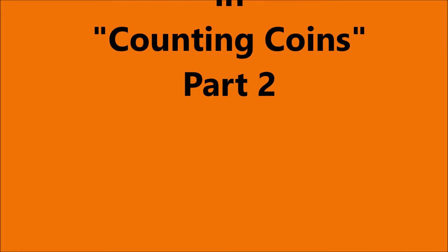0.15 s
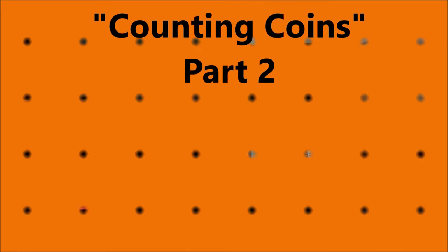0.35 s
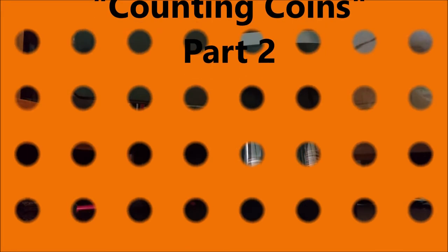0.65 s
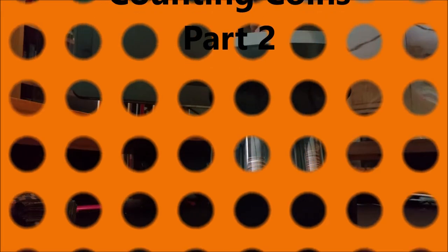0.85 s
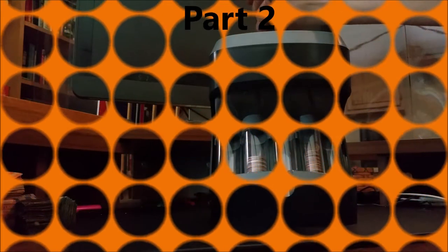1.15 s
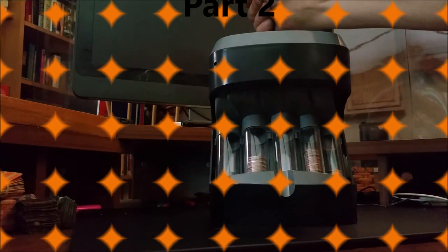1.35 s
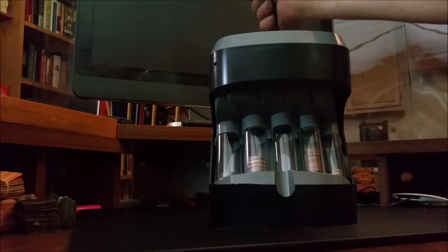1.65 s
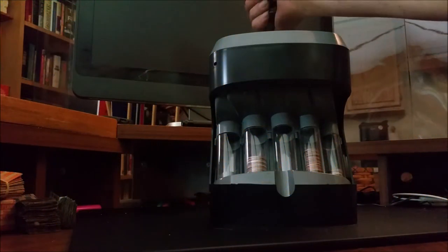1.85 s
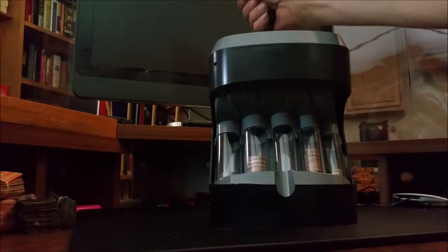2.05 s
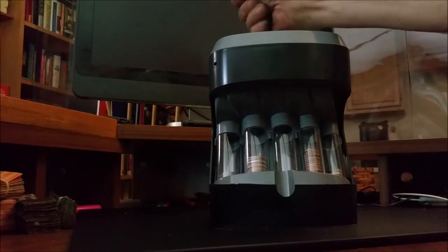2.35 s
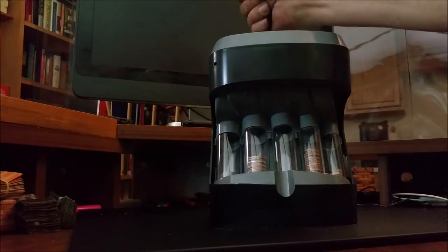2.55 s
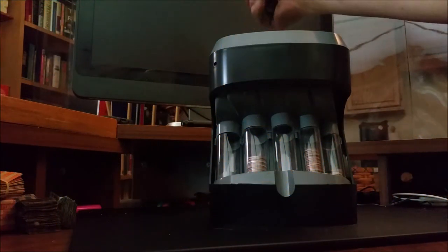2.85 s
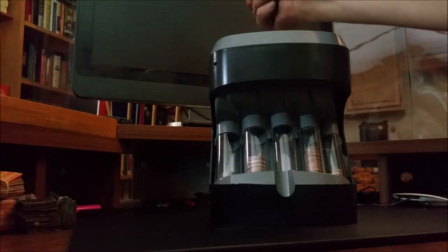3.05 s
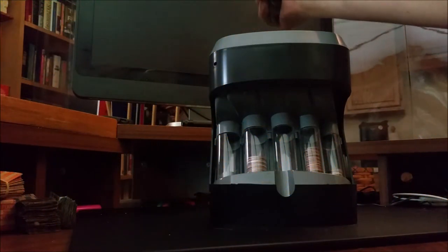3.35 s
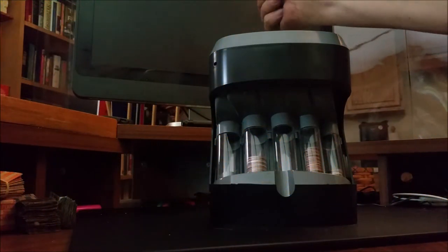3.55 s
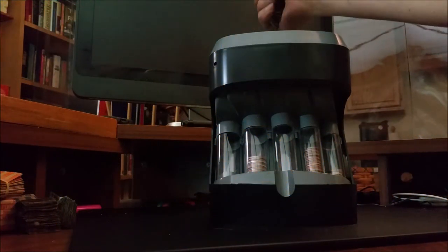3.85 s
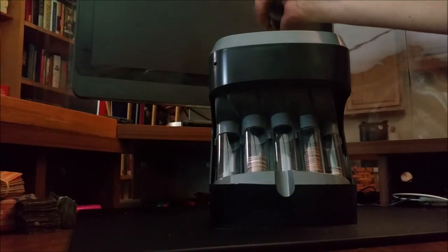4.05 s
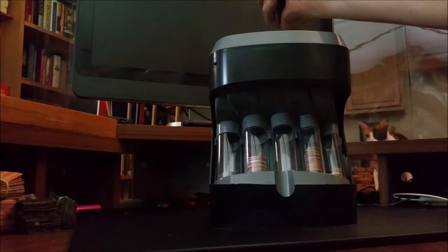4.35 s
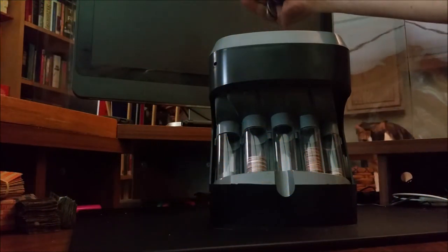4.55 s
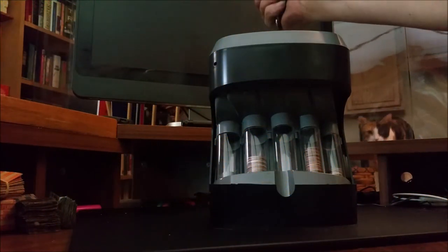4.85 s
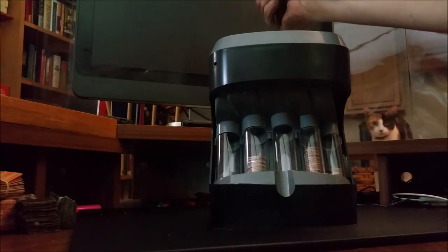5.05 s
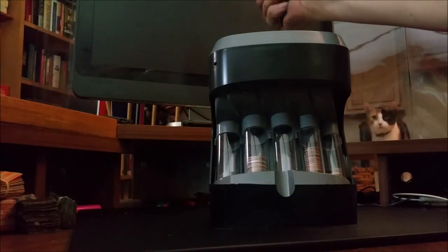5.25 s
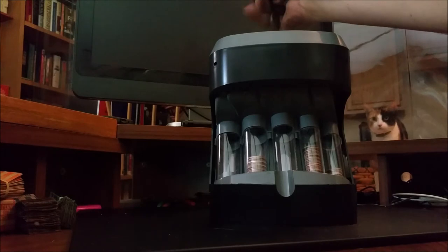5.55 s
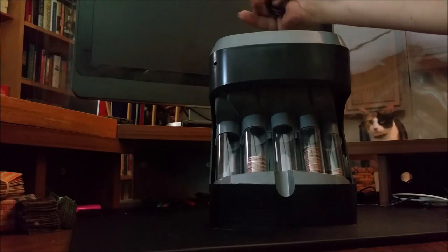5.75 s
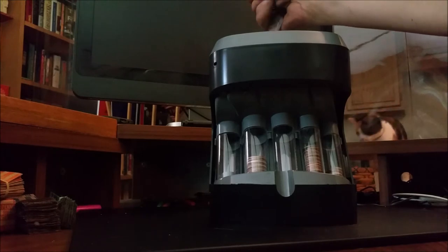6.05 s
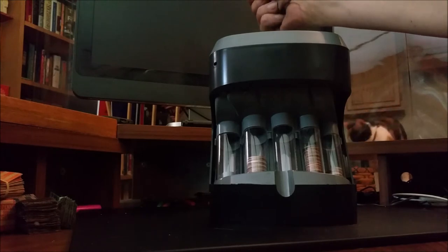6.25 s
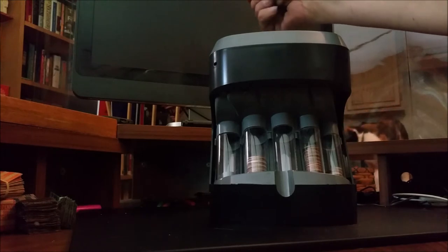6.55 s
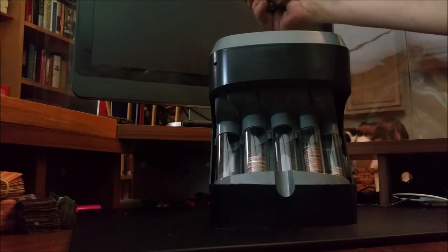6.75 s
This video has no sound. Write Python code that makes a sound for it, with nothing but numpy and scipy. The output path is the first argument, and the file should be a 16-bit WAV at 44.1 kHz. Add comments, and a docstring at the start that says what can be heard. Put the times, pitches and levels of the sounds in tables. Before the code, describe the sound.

After a moment of silence, the hum of a small motorized coin sorter cuts in at about 0.2 seconds: a steady gear tone with a low rumble and the light rustle of a turning disc. From 0.4 seconds coins drop into the plastic hopper, rattle down chutes and land in tubes, making sharp, irregular clacks mixed with bright metallic ticks and occasional thin, high rings. The clatter is dense until about 1.8 seconds, thins out, then returns with a loud cluster at 2.5 seconds. After a short lull around 3 seconds it picks up at 3.6 and carries on unevenly, with strong hits near 4.3, 5.8 and 6.3 seconds. The motor runs underneath throughout, a little softer around 4.5 to 5.5 seconds, and is still going at the end, near 7 seconds. The sound is close and in stereo, in a quiet room with little echo.

```python
"""A gear hum cuts in after a moment of silence: a small motor-driven coin sorter on a table.
Coins drop into the plastic hopper, rattle down the chutes and land in their tubes. Each blow rings
modes of the housing and the coin; falling coins ring thin and high, and tick against each other.
Underneath run the gear-mesh tone, a rumble and the rustle of the disc.
Quiet room, close stereo microphone; gain control ducks the loud blows."""
import sys
import numpy as np
from scipy import signal
from scipy.fft import rfft, irfft, next_fast_len
from scipy.io import wavfile
from scipy.ndimage import uniform_filter1d

SR = 44100
rng = np.random.default_rng(int(sys.argv[2]) if len(sys.argv) > 2 else 0)


def inscribe(sig):
    """Save sig as 16-bit PCM at rate SR to the path in sys.argv[1].

    A 1-D sig is mono; a 2-D sig holds one channel per row.
    Samples are clipped to [-1, 1] before scaling.
    """
    pcm = np.round(np.clip(np.atleast_2d(sig).T, -1, 1) * 32767)
    wavfile.write(sys.argv[1], SR, pcm.astype(np.int16))


N = 304731
START_S = 0.231
EVENT_SAMPLES, LEAD_SAMPLES = 6144, 128

# running machine: t/s, rumble level/dB, gear level/dB
MACHINE_LEVELS = [(.23, -38, -36.5), (.6, -37.5, -38), (.9, -34, -43.5), (1.1, -34, -38), (1.7, -33, -35.5),
                  (2.3, -34, -36), (2.7, -34, -37.5), (3.0, -34.5, -36.5), (3.5, -33, -34.5),
                  (4.25, -33.5, -38), (4.4, -36.5, -41.5), (4.7, -39, -43), (5.5, -39.5, -42),
                  (5.75, -34, -39), (6.2, -38, -41), (6.38, -44, -47), (6.55, -37, -41.5), (6.75, -34, -40),
                  (6.91, -41.5, -41)]
# gear-mesh harmonics: multiple, level/dB
GEAR_HARMONICS = [(1, -1), (2, -9.5), (3, -15.5), (5, -21), (6, -13.5), (8, -15.5), (9, -16), (12, -19.5),
                  (15, -52), (16, -24), (24, -22), (44, -41), (48, -40)]
# machine rumble, spectral shape: f/Hz, level/dB
RUMBLE_SPECTRUM = [(30, -38), (45, -25), (78, -20), (96, -6), (125, -9), (158, -3.5), (200, -13.5),
                   (260, -4), (390, -13.5), (450, -7.5), (600, -3.5), (700, -12.5), (900, -10.5),
                   (1100, -47), (1500, -37.5)]
# disc rustle, spectral shape: f/Hz, level/dB
RUSTLE_SPECTRUM = [(600, -15), (950, 3.5), (1100, -2), (1300, -0.5), (1750, -3), (1950, -4.5), (2500, -4.5),
                   (2900, -8.5), (4200, -14.5), (5700, -17.5), (7200, -27.5), (9000, -42.5), (12500, -22),
                   (16000, -36)]
# plastic housing resonances: f/Hz, width/Hz, level/dB
HOUSING_MODES = [(480, 30, -1), (586, 150, 4.5), (620, 31, -9), (798, 7.6, -9), (1245, 16, -37),
                 (1276, 19, -0.5), (1600, 47, -8.5), (1740, 180, -18.5), (2165, 117, -6), (2370, 58, -10.5),
                 (2483, 205, -3), (2730, 91, -10.5), (2926, 22, -9), (3180, 205, -7), (3440, 56, -2),
                 (3980, 30, -8.5), (4310, 66, -8), (4710, 43, -2), (5320, 280, -9.5), (5890, 81, -8),
                 (6300, 86, -8), (6830, 120, -11.5)]
# coin resonances: f/Hz, width/Hz, level/dB
COIN_MODES = [(8780, 350, -31), (9380, 400, -37), (11000, 150, -29.5), (12300, 67, -46), (12400, 58, -45),
              (14100, 72, -36), (14800, 82, -39), (14800, 51, -59)]
# broadband crack of an impact: f/Hz, level/dB
CRACK_SPECTRUM = [(300, -24), (600, 1.5), (1030, 8), (1400, 6.5), (2500, -3.5), (4600, 11.5), (7000, 1),
                  (9000, -20.5), (16000, -48)]
# coins ringing as they fall: t/s, level/dB, f/Hz, t60/s
FREE_RINGS = [(0.7344, -12, 15500, 0.098), (0.9672, -32, 15100, 0.19), (1.4995, -21, 12750, 0.17),
              (2.5294, -30, 12300, 0.48), (3.6012, -17, 12100, 0.19), (3.7135, -32, 12900, 0.18),
              (3.8267, -39, 13100, 0.6), (4.1244, -23, 12300, 0.14), (4.3, -27, 15500, 0.18),
              (4.65, -27, 15400, 0.13), (5.9614, -16, 14500, 0.12), (6.2647, -8, 14600, 0.064),
              (6.6717, -13, 15500, 0.09)]
# coin on coin, clearest ticks: t/s, treble level/dB, t60/s
COIN_TICKS = [(0.7314, -21.5, .1), (0.743, -21, 0.07), (0.9679, -9, 0.036), (1.0137, -24, 0.099),
              (1.1346, -14, .04), (1.2775, -27, 0.14), (1.483, -19, 0.22), (1.921, -25, 0.019),
              (2.154, -49, 0.033), (2.402, -25.5, 0.047), (2.5041, -9.5, 0.12), (2.5252, -11, .1),
              (2.683, -8, 0.062), (2.7386, -11.5, 0.071), (2.979, -25, 0.076), (3.002, -24, .06),
              (3.5658, -13, 0.15), (3.598, -10, .17), (4.127, -17, .054), (4.2876, -16, 0.12),
              (4.35, -18, 0.12), (4.428, -19.5, .076), (4.5511, -23, 0.099), (4.596, -23, 0.11),
              (4.7242, -32, 0.044), (4.7645, -29, 0.095), (4.9891, -32, .07), (5.0115, -22, 0.1),
              (5.0739, -19, 0.084), (5.3828, -20.5, .2), (5.681, -12, .05), (5.752, -28, .06),
              (5.839, -12.5, 0.11), (5.928, -18, 0.11), (5.989, -15, 0.14), (6.2267, -17, .11),
              (6.281, -14, 0.15), (6.641, -19, 0.042), (6.6746, -14, 0.1), (6.83, -28, 0.076)]
# coin on housing: t/s, level/dB, struck-spot f/Hz, relative clink level/dB, t60/s
COIN_BLOWS = [(0.3609, -2.5, 2370, -20.5, 0.11), (.3873, -8.5, 2400, -10, 0.081),
              (0.4692, -15.5, 2410, -18, 0.059), (0.53, -5, 3400, -9, 0.067), (.598, -8, 2420, -11, 0.11),
              (0.619, -3, 2370, -16, 0.097), (0.6491, -6, 1640, -12, 0.13), (0.7169, -8, 3620, -11, 0.058),
              (0.7322, -12.5, 2420, -8, 0.075), (.7993, -10, 3500, -8.5, 0.14),
              (0.8484, -12, 2780, -18, 0.28), (.861, -5.5, 3970, -6, 0.074), (0.873, -7, 3930, -8, 0.037),
              (0.9689, -6.5, 5000, -3, 0.045), (1.0853, -11.5, 2290, -8, 0.06),
              (1.1114, -10, 1290, -4, 0.051), (1.1338, -8.5, 5300, 1, 0.055), (1.1435, -11, 4760, 3, 0.05),
              (1.1758, -15, 2220, -8, 0.19), (1.1903, -12.5, 2830, -19, 0.15),
              (1.2052, -9.5, 1640, -5, 0.084), (1.2287, -7.5, 2300, 5, 0.024),
              (1.2384, -10.5, 5400, 2.5, .11), (1.2768, -13, 1570, -3, 0.21), (1.2907, -9, 2480, -5, 0.17),
              (1.3627, -6, 2640, -2.5, 0.096), (1.3963, 0, 1370, -10, 0.16), (1.407, -8, 1280, -4, 0.09),
              (1.4389, -3, 3300, -6, 0.16), (1.4487, 0, 3050, -5, 0.035), (1.481, -6.5, 2160, -18, 0.3),
              (1.5026, -4.5, 4660, -1.5, .064), (1.5365, -11, 2100, -15, 0.14),
              (1.5693, -10.5, 2200, -13, .23), (1.7364, -8.5, 2600, -9, 0.15),
              (1.7592, -10, 2350, -1.5, 0.055), (1.952, -20.5, 3460, -6, 0.056),
              (1.9767, -18.5, 2380, -9, 0.15), (2.2305, -19, 2160, -9.5, .046),
              (2.4881, 0.7, 1270, -6.5, 0.056), (2.5055, -1.5, 2350, -10, 0.12),
              (2.5262, -4.5, 2280, -5.5, 0.13), (2.5526, -10.5, 2190, -7.5, 0.16),
              (2.6294, -7.5, 2660, -1.5, 0.15), (2.6469, -16, 2670, -2, 0.073),
              (2.681, -6, 1620, -3.5, 0.11), (2.7397, -12, 2600, -2.5, .14), (2.7775, -17, 1330, -4, 0.1),
              (2.816, -17.5, 2600, -9, 0.22), (2.8477, -7, 3540, -18, 0.1), (2.865, -9, 1690, -8, 0.12),
              (2.9495, -7, 2765, -5.5, 0.087), (3.3122, -17, 2630, -1.5, 0.063),
              (3.3648, -19, 1700, -10, 0.12), (3.443, -17, 2210, -21, 0.12),
              (3.5656, -1, 1270, -15.5, 0.087), (3.598, -2, 2190, -4, 0.18), (3.6122, -9, 2150, -10, 0.12),
              (3.6422, -9, 2080, -12, 0.16), (3.714, -9, 2250, -1.5, 0.14),
              (3.7647, -13.5, 2180, -10, 0.14), (3.8006, -9.5, 2920, -5, 0.072),
              (3.8257, -6.5, 2600, -6, 0.052), (3.8423, -7.5, 2330, 0, 0.1),
              (3.8847, -9.5, 1600, -5, 0.077), (3.9565, -15.5, 5300, 0.5, 0.12),
              (3.987, -9.5, 4930, -2.5, 0.1), (3.9965, -6.5, 2720, 0.5, 0.079),
              (4.051, -13.5, 2300, -15, 0.09), (4.0886, -19, 2600, -6, 0.056),
              (4.125, -16, 1160, -8, 0.065), (4.2883, 3.5, 1290, -17, 0.069), (4.3017, 0, 2500, -7, 0.046),
              (4.3272, -4, 2390, -8.5, 0.081), (4.3517, -0.5, 1300, -24, 0.075),
              (4.3677, -8.5, 1300, -9, 0.12), (4.428, -10.5, 2310, -17, 0.066),
              (4.4446, -9, 2130, -13, 0.1), (4.4585, -5, 2740, -5.5, 0.055),
              (4.5509, -13.5, 1210, -15, 0.093), (4.5775, -18, 3450, -5, 0.37),
              (4.611, -14, 2480, -3.5, 0.16), (4.6563, -9, 2300, -10, 0.073),
              (4.7643, -16.5, 1200, -1, 0.17), (4.779, -11.5, 4940, 5.5, 0.04),
              (4.866, -15, 1610, 1, 0.061), (4.9172, -16.5, 2280, -33, 0.14),
              (4.9283, -14.5, 2380, -11, 0.16), (5.0109, -17.5, 1470, -5.5, 0.15),
              (5.023, -9.5, 1220, -14, 0.065), (5.0742, -18, 5170, 5.5, 0.1),
              (5.086, -12.5, 4500, -1, 0.056), (5.1455, -4.5, 1350, -11.5, 0.18),
              (5.1814, -5, 1380, -8, 0.11), (5.214, -9, 2400, -9.5, .11), (5.2824, -5.5, 1265, -11, 0.091),
              (5.3344, -13, 2140, -8, 0.099), (5.3831, -8.5, 2150, -18, .21), (5.399, -12, 2130, -5, 0.13),
              (5.6283, -15, 2800, -12, 0.05), (5.637, -9, 2200, -14, 0.028), (5.68, -8.5, 5300, 0.5, 0.052),
              (5.734, -11.5, 1510, 0, 0.06), (5.753, -13, 1770, -5.5, 0.33),
              (5.8024, 0.5, 1260, -9.5, 0.11), (5.832, -1.5, 2785, -7.5, 0.19),
              (5.9292, -16.5, 4630, -2, .1), (5.962, -8, 3350, -10, 0.18), (5.9886, -7, 2160, -22, 0.12),
              (6.196, -22, 2570, -7, 0.12), (6.2284, -2, 1300, -28, 0.14), (6.2376, -5.5, 2350, -6, 0.25),
              (6.2816, -10.5, 2240, -10, 0.16), (6.351, -1, 2430, -19, 0.061),
              (6.3611, -8, 2340, -13.5, 0.067), (6.3734, -8, 2430, -16, 0.13),
              (6.5117, -4, 2300, -10.5, 0.048), (6.557, -16, 1610, -26, 0.21),
              (6.573, -12, 3520, -13, 0.097), (6.6548, -8.5, 2240, -7.5, 0.19),
              (6.674, -6, 4260, -11, 0.12), (6.761, -14, 2260, -4.5, 0.043), (6.83, -30, 1300, -12, 0.062)]
# room decay: f/Hz, t60/s
ROOM_DECAY = [(300, 0.25), (1000, 0.22), (3000, 0.26), (14000, 0.21)]
# left-right likeness: f/Hz, coherence
COHERENCE = [(60, 0.82), (400, 0.99), (1000, 0.32), (2500, 0.58), (5000, 0.27), (9000, 0.025),
             (15000, 0.062)]
# microphone balance: f/Hz, left minus right level/dB
BALANCE = [(60, 1), (130, 1.5), (290, -1.5), (640, 1.5), (1410, 0.5), (3100, 0), (6820, -4.5), (15000, 2.5)]


def gain_of(db):
    """Decibels to amplitude."""
    return 10 ** (np.asarray(db) / 20)


def unit_rms(x):
    """Scale to rms 1."""
    return x / np.sqrt(np.mean(x ** 2) + 1e-20)


def at_hz(table, hz):
    """Interpolate a table over log frequency."""
    f, value = np.transpose(table)
    return np.interp(np.log(hz + 1), np.log(f + 1), value)


def add(mix, start_s, sound):
    """Mix a stereo sound in at start_s."""
    part = mix[:, round(start_s * SR):][:, :sound.shape[1]]
    part += sound[:, :part.shape[1]]


def wander(top_hz):
    """Random drift up to top_hz, rms 1."""
    t = np.arange(0, N, 128) / SR
    rates_hz = np.geomspace(top_hz / 20, top_hz, 12)
    drift = sum(np.sin(2 * np.pi * (f * t + rng.random())) / np.sqrt(f) for f in rates_hz)
    return np.interp(np.arange(N) / SR, t, unit_rms(drift))


def stereo_pair(left, other, hz):
    """Two independent spectra to a partly coherent pair."""
    coherence = at_hz(COHERENCE, hz)
    return np.array([left, coherence * left + np.sqrt(1 - coherence ** 2) * other])


def noise(spectrum, size, patchy_db=1.2):
    """Coloured stereo noise, patchy in time and frequency, rms 1."""
    frames, hz = 4 * N // size + 5, np.fft.rfftfreq(size, 1 / SR)[:, None]
    a, b, c, d, patches = rng.standard_normal((frames, len(hz), 5)).T
    patches = unit_rms(uniform_filter1d(uniform_filter1d(patches, 8, axis=0), 8, axis=1))
    bins = stereo_pair(a + 1j * b, c + 1j * d, hz) * gain_of(at_hz(spectrum, hz) + patchy_db * patches)
    return unit_rms(signal.istft(bins, nperseg=size, noverlap=size * 3 // 4)[1][:, :N])


def room(x):
    """Reverb tail: sparse reflections of random sign, t60 per band."""
    taps = np.zeros((2, SR // 2))
    slots = np.arange(120, SR // 2 - 20, 20)
    delays = slots + rng.integers(0, 20, (2, len(slots)))
    np.put_along_axis(taps, delays, rng.choice([-1., 1.], delays.shape), 1)
    hz, t, bins = signal.stft(taps, SR, nperseg=256)
    tail = signal.istft(bins * gain_of(-60 * t / at_hz(ROOM_DECAY, hz)[:, None]), SR, nperseg=256)[1]
    return signal.fftconvolve(x, tail / np.linalg.norm(tail[0]), axes=1)[:, :N]


def machine(mesh_hz=285.2, hum_hz=58.5):
    """Drive: meshing gear teeth, low hum, throbbing rumble, rustling disc."""
    t = np.arange(N) / SR
    knots_s, rumble_db, gear_db = np.transpose(MACHINE_LEVELS)
    rumble_db, gear_db = np.interp(t, knots_s, rumble_db), np.interp(t, knots_s, gear_db)
    mesh_cycles = np.cumsum(mesh_hz * (1 + 0.0012 * wander(12))) / SR
    gears = sum(gain_of(db + 2.7 * wander(60)) * np.sin(2 * np.pi * (k * mesh_cycles + rng.random()))
                for k, db in GEAR_HARMONICS)
    hum = gain_of(-17.5 + 0.51 * wander(13)) * np.sqrt(2) * np.sin(2 * np.pi * hum_hz * t)
    rustle_db = -36.5 + 0.42 * (rumble_db - rumble_db.mean()) + 1.2 * wander(60)
    throb = 1 + 0.32 * np.cos(np.pi * mesh_cycles)  # once per shaft turn
    rumble = throb * noise(RUMBLE_SPECTRUM, size=4096)
    rustle = gain_of(rustle_db) * noise(RUSTLE_SPECTRUM, size=1024)
    return np.sqrt(2) * gain_of(gear_db) * gears + gain_of(rumble_db) * (hum + rumble) + rustle


def resonance(hz, mode_hz, width_hz, level_db):
    """Summed response of damped modes."""
    return (gain_of(level_db) / (1 + 2j * (hz - mode_hz) / width_hz)).sum(0)


def impact(spot_hz, bands_db, t60_s):
    """Click and dying rattle drive housing and coin modes. bands_db: thud, body, clink, treble."""
    t, hz = np.arange(EVENT_SAMPLES) / SR, np.fft.rfftfreq(EVENT_SAMPLES, 1 / SR)
    fade = gain_of(-60 * t / np.clip(t60_s, 0.02, 0.3))
    lumps = gain_of(2.2 * unit_rms(uniform_filter1d(rng.standard_normal(EVENT_SAMPLES), 60)))
    rattle = rng.standard_normal((2, EVENT_SAMPLES)) * lumps * np.minimum(t / 0.00073, 1)
    click = np.exp(-t / 0.001) * rng.standard_normal(EVENT_SAMPLES)
    left, other = rfft(np.roll((click + rattle) * fade, LEAD_SAMPLES, axis=1))
    # modes near the struck spot's pitch ring most
    mode_hz, width_hz, db = np.transpose(HOUSING_MODES + [(spot_hz, 90, 1.5)])[:, :, None]
    scatter_db = 4.4 * rng.standard_normal(db.shape) * (mode_hz != spot_hz)
    housing = resonance(hz, mode_hz, width_hz, db - 6 * abs(np.log2(mode_hz / spot_hz)) + scatter_db)
    mode_hz, width_hz, db = np.transpose(COIN_MODES)[:, :, None]
    coin = resonance(hz, mode_hz, width_hz, db + 4 * rng.standard_normal(db.shape))
    crack = gain_of(at_hz(CRACK_SPECTRUM, hz) - 16.5)
    spectrum = stereo_pair(left, other, hz) * (housing + coin + crack)
    lowpasses = [1 / (1 + (hz / edge_hz) ** 8) for edge_hz in (330, 950, 3600, 7300, SR)]
    bands = irfft(spectrum * np.diff(lowpasses, axis=0)[:, None], EVENT_SAMPLES)
    # equal energy per band, set by the decay length
    bands *= 0.61 * np.linalg.norm(fade) / np.linalg.norm(bands, axis=(1, 2), keepdims=True)
    return np.tensordot(gain_of(bands_db), bands, 1)


def free_rings(mix, attack_s=0.029):
    """Falling coins: one high mode each, smeared by tumbling."""
    t = np.arange(EVENT_SAMPLES) / SR
    for start_s, db, hz, t60_s in FREE_RINGS:
        tumble = unit_rms(uniform_filter1d(rng.standard_normal((2, 2, EVENT_SAMPLES)), 250))
        phase = 2 * np.pi * hz * t
        ring = tumble[0] * np.sin(phase) + tumble[1] * np.cos(phase)
        add(mix, start_s, gain_of(db - 60 * t / t60_s) * np.minimum(t / attack_s, 1) * ring)


def coin_ticks(mix, faint_per_s=4, faint_floor_db=-42, faint_t60_s=0.04):
    """Coin on coin: mostly treble. Listed ticks plus faint random ones."""
    waits, strengths = -np.log(rng.random((60, 2)).T)
    times_s = START_S + np.cumsum(waits) / faint_per_s
    faint = [(s, db, faint_t60_s) for s, db in zip(times_s, faint_floor_db + 3 * strengths)]
    for start_s, db, t60_s in COIN_TICKS + faint:
        spot_hz = 2500 * 2 ** rng.random()
        bands_db = db + np.array([-34, -23, -12, 0])
        add(mix, start_s - LEAD_SAMPLES / SR, impact(spot_hz, bands_db, t60_s))


def coin_blows(mix):
    """Coins hit hopper, chutes and tubes; the thud stands out in low-pitched and soft blows."""
    for start_s, db, spot_hz, clink_db, t60_s in COIN_BLOWS:
        thud_db = -11 - 2.5 * np.log2(spot_hz / 2000) - 0.27 * db + 4.5 * rng.standard_normal()
        treble_db = -8.5 + 0.71 * clink_db
        bands_db = db + np.array([thud_db, 0, clink_db, treble_db])
        add(mix, start_s - LEAD_SAMPLES / SR, impact(spot_hz, bands_db, t60_s))


def scene():
    """Coin clatter and its room tail over the machine."""
    clatter = np.zeros((2, N))
    coin_blows(clatter)
    free_rings(clatter)
    coin_ticks(clatter)
    return gain_of(-3) * clatter + gain_of(-10) * room(clatter) + machine()


def gain_control(x, threshold_db=-19, slope=0.14, release_db_per_s=20.5):
    """Fast turn-down after loud blows, slow recovery."""
    power = uniform_filter1d((x ** 2).mean(0), 800, origin=399)
    power_db = 10 * np.log10(abs(power) + 1e-12)
    release_db = np.arange(N) * release_db_per_s / SR
    held_db = np.maximum.accumulate(power_db + release_db) - release_db
    return x / gain_of(slope * np.maximum(held_db - threshold_db, 0))


def record(dry):
    """Gain control, microphone response, abrupt start, overload, 40 Hz to 15.9 kHz band limit."""
    size = next_fast_len(N + 512)
    hz = np.fft.rfftfreq(size, 1 / SR)
    balance = gain_of(at_hz(BALANCE, hz) / 2)
    left_lag = np.exp(-2j * np.pi * hz * 2 / SR)  # 2 samples
    dip = 1 - 0.5 / (1 + ((hz - 1030) / 90) ** 2)
    x = irfft(rfft(gain_control(dry), size) * dip * [balance * left_lag, 1 / balance], size)[:, :N]
    gate = np.clip((np.arange(N) / SR - START_S) / 0.00043, 0, 1)
    x = np.clip(x * gate, -0.96, 0.96)
    x = signal.sosfilt(signal.butter(2, 40, "high", fs=SR, output="sos"), x)
    lowpass = signal.firwin(511, 15900, window=("kaiser", 9), fs=SR)
    return signal.oaconvolve(x, lowpass[None], "same")


dry = scene()
out = record(dry)
inscribe(out)
```